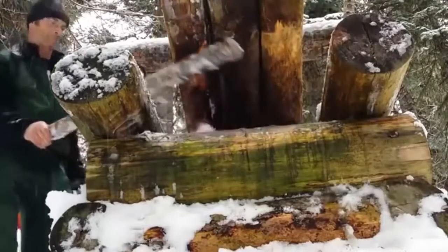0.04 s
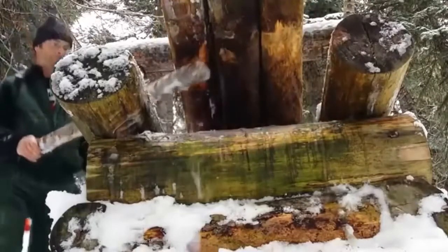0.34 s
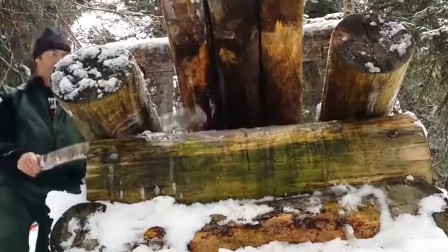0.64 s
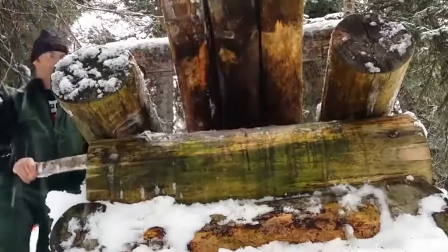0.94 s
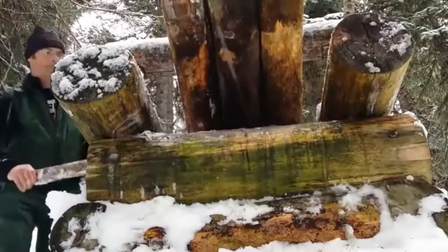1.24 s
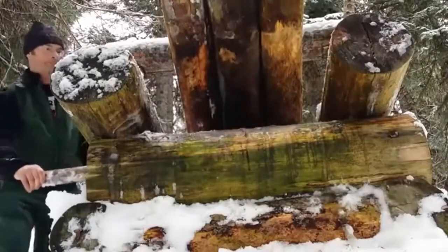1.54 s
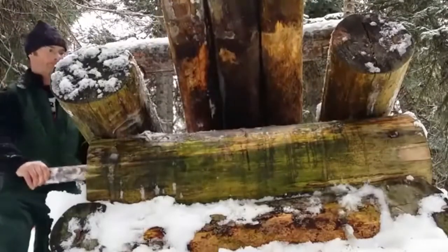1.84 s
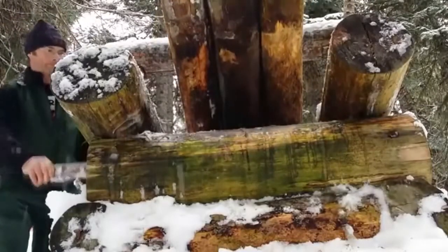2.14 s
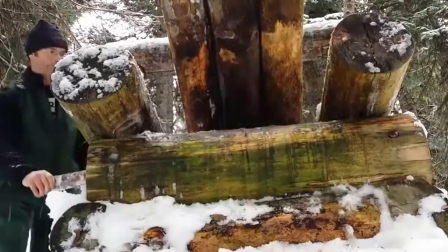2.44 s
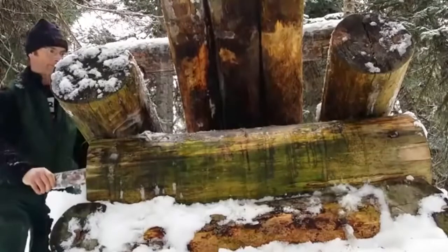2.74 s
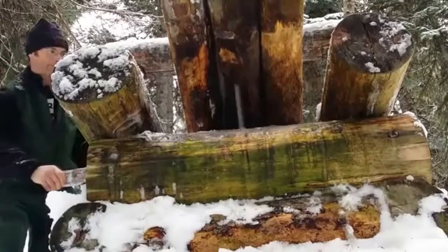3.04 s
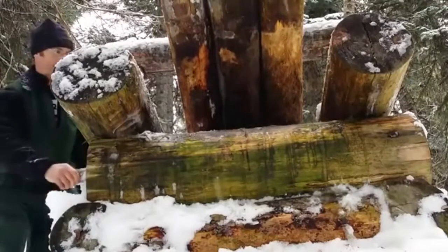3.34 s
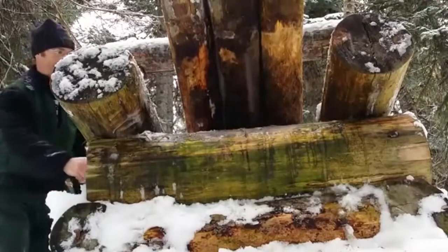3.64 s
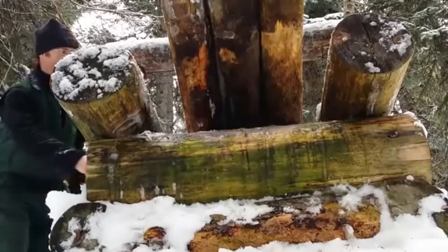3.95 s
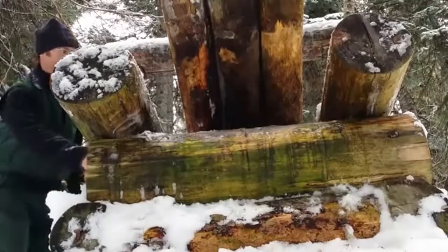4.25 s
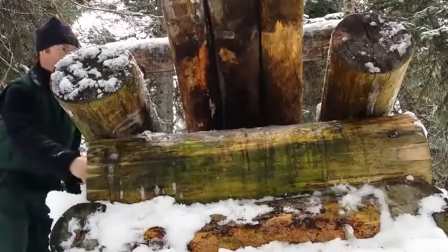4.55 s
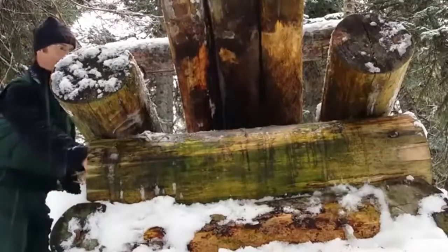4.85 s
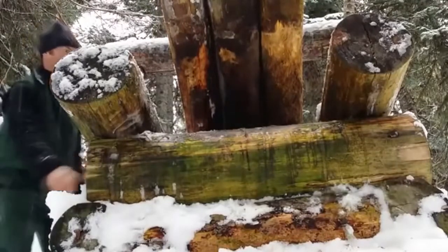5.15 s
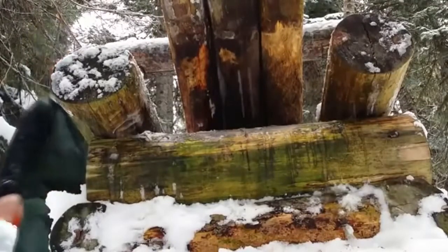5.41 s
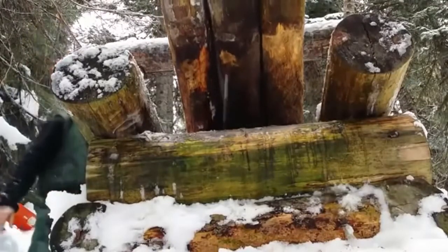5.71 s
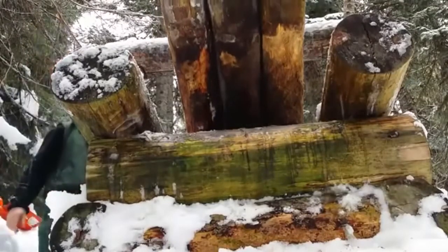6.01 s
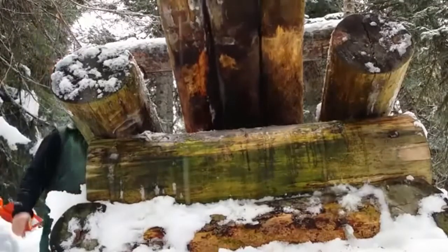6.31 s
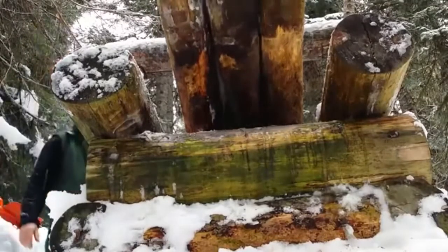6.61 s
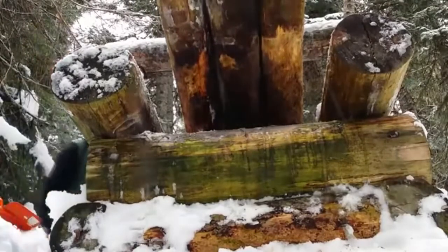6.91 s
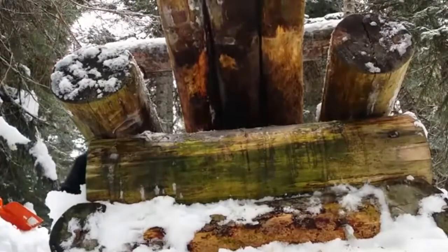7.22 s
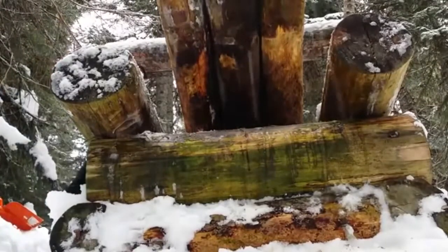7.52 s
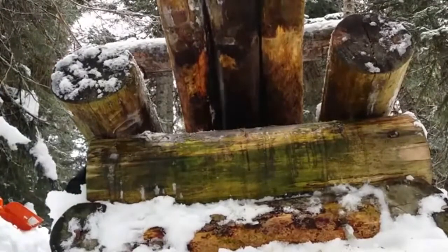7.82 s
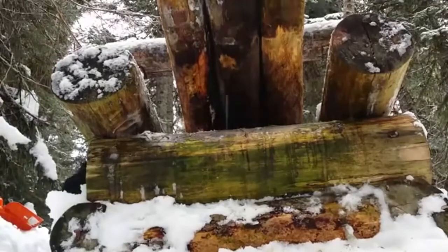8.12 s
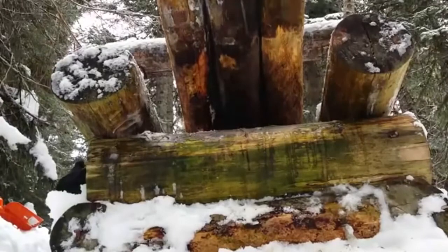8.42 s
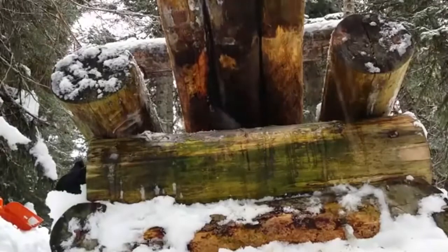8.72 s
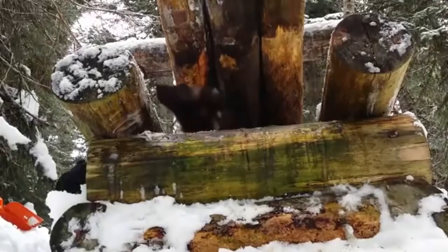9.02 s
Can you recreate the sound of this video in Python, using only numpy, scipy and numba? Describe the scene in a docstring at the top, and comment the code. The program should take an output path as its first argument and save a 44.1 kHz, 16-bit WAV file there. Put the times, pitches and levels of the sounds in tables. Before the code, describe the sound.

A bear roars harshly four times with fluttering snarls, then keeps up low, breathy growls inside a log den.

```python
"""A harsh roar comes first: a bear shut in a log den in a snowy forest, heard from just outside on a stereo
pair. It roars four times, its vocal folds chopping a blast of air, and after each roar its lips flap in a
snarl. Then it keeps up low, rumbling growls while air hisses through its nose, with moans, one rasp and one
short groan. Now and then it bumps the logs; faint forest air lies behind."""
import sys
import numpy as np
from scipy import signal
from scipy.fft import rfft, irfft, next_fast_len
from scipy.io import wavfile
from scipy.ndimage import uniform_filter1d
from numba import njit

SR = 44100
rng = np.random.default_rng(int(sys.argv[2]) if len(sys.argv) > 2 else 0)


def transcribe(u):
    """Save the signal u as a 16-bit wav file named by the first command-line argument.

    u: samples, shape (n,) or (channels, n), limited to [-1, 1]; the rate is SR.
    q: integer samples, one column per channel.
    """
    v = np.clip(np.atleast_2d(u).T, -1, 1)
    q = np.round(v * 32767).astype(np.int16)
    wavfile.write(sys.argv[1], SR, q)


N = 408531
T = np.arange(N) / SR
FFT_SIZE = next_fast_len(N + 4096)
HZ = np.maximum(np.arange(FFT_SIZE // 2 + 1) * SR / FFT_SIZE, 1)


def from_db(db):
    return 10 ** (np.asarray(db) / 20)


def rms_one(x):
    return x / np.sqrt(np.mean(x ** 2) + 1e-20)


def add(out, s, sound):
    """Mix a short sound in at s seconds."""
    i = int(s * SR)
    sound, i = sound[..., max(-i, 0):], max(i, 0)
    out[..., i:i + sound.shape[-1]] += sound[..., :N - i]


def envelope(attack, hold, release, swell_db=0, curve=1):
    """A rounded attack, a hold that swells or sags, a release of 60 dB (curve over 1: slow at first)."""
    t = np.arange(int((attack + hold + release) * SR)) / SR
    rise = np.sin(np.pi / 2 * np.minimum(t / attack, 1)) ** 2
    held = np.clip((t - attack) / hold, 0, 1)
    gone = np.maximum(t - attack - hold, 0) / release
    return rise * from_db(swell_db * held - 60 * gone ** curve)


def during(start, end, fade):
    """1 from start to end, with fades outside."""
    return np.clip(np.minimum(T - start, end - T) / fade + 1, 0, 1)


def at_hz(points):
    """Join (f/Hz, value) points over log frequency."""
    hz, value = np.transpose(points)
    return np.interp(np.log(HZ), np.log(hz), value)


def shape(x, gain):
    """Apply a smooth gain over frequency."""
    return irfft(rfft(x, FFT_SIZE) * gain, FFT_SIZE)[..., :N]


def drift(rate_hz):
    """A smooth random wander of spread 1."""
    step, settle = 40, 2000
    r = np.exp(-2 * np.pi * rate_hz * step / SR)
    noise = rng.standard_normal(N // step + settle + 2)
    slow = signal.lfilter([1], [1, -2 * r, r * r], noise)[settle:]
    return np.interp(np.arange(N) / step, np.arange(len(slow)), rms_one(slow))


def pulses(per_s, jitter, shimmer_db):
    """Clicks at a running rate, each off in time (share of a cycle) and strength."""
    cycles = np.cumsum(per_s) / SR
    at = np.flatnonzero(np.diff(np.ceil(cycles), prepend=0))
    late, strong = rng.standard_normal((len(at), 2)).T
    at = np.clip(at + jitter * late * SR / per_s[at], 0, N - 1).astype(int)
    out = np.zeros(N)
    out[at] = from_db(shimmer_db * strong)
    return out


def puffs(clicks, rise_s):
    """Each click lets out a puff that swells to the click's height and dies."""
    r = np.exp(-1 / (rise_s * SR))
    return signal.lfilter([np.e / (rise_s * SR)], [1, -2 * r, r * r], clicks + 1e-18)


def tone(hz):
    """A sine that follows a running pitch."""
    return np.sin(2 * np.pi * np.cumsum(hz) / SR)


def steady(x, span_s):
    """Hold the running rms near 1."""
    power = np.mean(np.atleast_2d(x) ** 2, axis=0)
    for _ in range(2):
        power = uniform_filter1d(power, max(int(span_s * SR), 1))
    return x / np.sqrt(np.abs(power) + 1e-12)


def split(x, crossover_hz=1120):
    """The throaty part and the bright part of a voice."""
    low = 1 / (1 + (HZ / crossover_hz) ** 8)
    return shape(x, low), shape(x, 1 - low)


def ring(x, hz, width_hz):
    """Pass twice through one resonance; rms 1."""
    b, a = signal.iirpeak(hz, hz / width_hz, fs=SR)
    return rms_one(signal.lfilter(b, a, signal.lfilter(b, a, x)))


@njit
def moving_peak(x, angle, up, down):
    """A peak or dip whose centre (radians per sample) moves; its two states turn like a phasor."""
    out, a, b = np.empty(len(x)), 0., 0.
    for i in range(len(x)):
        out[i] = x[i] + (up - down) * a
        a += x[i] - down * a - angle[i] * b
        b += angle[i] * a
    return out


def resonate(x, modes, stretch=1):
    """A chain of ringing peaks and dips, all moved together by the shape of the mouth."""
    for hz, width, boost_db in modes:
        gain, damping = from_db(boost_db), 2 * np.pi * width / SR
        up, down = damping * max(gain, 1), damping / min(gain, 1)
        angle = 2 * np.sin(np.pi * hz / SR) * stretch * np.ones(N)
        x = np.array([moving_peak(side, angle, up, down) for side in x])
    return x


# How alike the air is at the two microphones: f/Hz, correlation
MIC_LIKENESS = [(800, .99), (1400, .88), (3100, .7), (6800, .2), (14000, .05)]
def air(colour):
    """Coloured noise across the pair, alike in the bass and wide in the treble; rms 1."""
    mid, side = rfft(rng.standard_normal((2, FFT_SIZE)))
    alike = at_hz(MIC_LIKENESS)
    pair = np.sqrt(1 + alike) * mid + np.sqrt(1 - alike) * side * np.array([[1], [-1]])
    return rms_one(irfft(pair * from_db(at_hz(colour)), FFT_SIZE)[:, :N])


# The forest all around the microphones: f/Hz, level/dB
FOREST_COLOUR = [(30, -16), (477, -4.5), (4500, -8.5), (7200, -8.5), (14500, -27.5)]
def forest(level_db=-60.5):
    """The faint, even hush of a still forest."""
    return from_db(level_db) * air(FOREST_COLOUR)


# Sharp clicks, one in the first snarl, then a few faint ticks: t/s, level/dB
SHARP_CLICKS = [(0.2246, -11.5), (2.6305, -36), (3.632, -33.5), (5.7176, -30.5), (6.0973, -33)]
def sharp_clicks(t60=.035, trim_db=-8):
    """Each click is a burst of bright noise that dies at once."""
    out, t = np.zeros((2, N)), T[:SR // 2]
    for s, level_db in SHARP_CLICKS:
        add(out, s, from_db(level_db + trim_db - 60 * t / t60) * rng.standard_normal((2, len(t))))
    return out


# Knocks on the den wall: t/s, level/dB, ring/s
LOG_KNOCKS = [(2.888, -29, 0.023), (2.972, -16.5, 0.023), (2.978, -35, 0.09), (3.0, -36, 0.071),
              (3.174, -23, 0.029), (6.098, -34.5, 0.023), (6.161, -38, 0.025), (6.335, -41.5, 0.097)]
# Modes of a damp log: f/Hz, level/dB
LOG_MODES = [(520, 8.5), (640, 9.5), (790, 0), (1010, 2.5), (1240, -9), (1560, -16)]
# The heavy body against the wall: t/s, f/Hz, level/dB, ring/s
BODY_BUMPS = [(0.242, 75.6, -12.5, 0.25), (0.236, 200, -11.5, 0.071), (1.9, 230, -26, 0.049),
              (6.335, 380, -34, 0.32), (6.335, 477, -25, 0.098)]
def logs(knock_db=-8, crunch=.9, crunch_hz=(500, 2300)):
    """Damp logs ring briefly with a dry crunch when knocked, and boom when leaned on."""
    out, t = np.zeros((2, N)), T[:SR // 2]
    crunch_band = signal.butter(2, crunch_hz, "band", fs=SR, output="sos")
    for s, level_db, t60 in LOG_KNOCKS:
        chance = rng.standard_normal((len(LOG_MODES), 2))
        modes = sum(from_db(db + 2 * strong) * np.sin(2 * np.pi * hz * t + phase)
                    for (hz, db), (strong, phase) in zip(LOG_MODES, chance))
        grit = rms_one(signal.sosfilt(crunch_band, rng.standard_normal(len(t))))
        gain = from_db(level_db + knock_db - 60 * t / t60) * (1 - np.exp(-t / .0038))
        add(out, s, gain * (modes + crunch * grit))
    for s, hz, level_db, t60 in BODY_BUMPS:
        gain = from_db(level_db - 60 * t / t60) * (1 - np.exp(-t / .00087))
        add(out, s, gain * np.sin(2 * np.pi * hz * t))
    return out


def den_echoes(x, t60=.045, wet=.5):
    """Dense early echoes off the logs, partly different at each microphone, comb the sound."""
    t = T[:int(t60 * SR)]
    shared, left, right = rng.standard_normal((3, len(t))) * from_db(-60 * t / t60) * (t > .001)
    echoes = shared + .42 * np.array([left, right])
    echoes /= np.sqrt(np.sum(echoes ** 2, axis=1, keepdims=True))
    return x + wet * signal.fftconvolve(x, echoes, axes=1)[:, :N]


# A rasp between growls: t/s, attack/s, hold/s, release/s, swell/dB, level/dB
RASP_BREATHS = [(5.06, .15, .57, .45, -5, -39.5)]
# Its rush of air: f/Hz, level/dB
RASP_AIR = [(210, -9), (350, -12), (880, 11), (2250, -16), (2800, -20), (4300, -14.5), (6000, -13),
            (9000, -33), (12000, -49)]
# Resonances of the narrowed airway: f/Hz, width/Hz, boost/dB
AIRWAY_MODES = [(910, 46, -14.5), (1058, 42, 8), (1318, 32, 12.5), (2040, 69, 20), (2496, 45, 20.5),
                (3050, 110, 16), (3710, 39, 18.5), (4200, 48, 18.5), (4800, 120, 11)]
def rasp(flutter_per_s=33, leak=.5):
    """The soft palate flutters in a narrowed, ringing airway."""
    flutter = pulses(flutter_per_s * from_db(drift(6.4)), jitter=.091, shimmer_db=5)
    voice = resonate(air(RASP_AIR) * (leak + puffs(flutter, rise_s=.013)), AIRWAY_MODES)
    gain = np.zeros(N)
    for s, attack, hold, release, swell_db, level_db in RASP_BREATHS:
        add(gain, s, from_db(level_db) * envelope(attack, hold, release, swell_db))
    return gain * steady(voice, span_s=.15)


# Moans and wheezes: t/s, attack/s, hold/s, release/s, level/dB, f/Hz
BREATH_MOANS = [(2.203, 0.042, 0.035, 0.24, -26.5, 689), (2.514, .02, 0.024, 0.18, -38, 2385),
                (4.2, 0.18, .2, .4, -51, 838), (4.254, 0.14, 0.13, 0.62, -51, 2450),
                (4.25, 0.13, .25, 0.45, -55, 1210), (4.3, .1, 0.22, .5, -58, 5170),
                (5.16, .035, .036, 0.2, -45.5, 2525), (5.255, 0.032, 0.068, 0.23, -50, 1070),
                (5.688, 0.079, 0.041, 0.085, -46.5, 486), (5.732, 0.056, 0.025, 0.32, -46, 1460),
                (8.455, 0.13, 0.054, 0.091, -42.5, 630)]
def moans(hiss, snuffle, breath_db=-9):
    """Breath rings through the parted lips or the nostrils, with some snuffle around the ring."""
    out = np.zeros((2, N))
    for s, attack, hold, release, level_db, hz in BREATH_MOANS:
        effort = envelope(attack, hold, release)
        span = slice(int(s * SR), int(s * SR) + len(effort))
        ringing = ring(hiss[:, span] + snuffle[:, span], hz, width_hz=160 + .05 * hz)
        voice = ringing + from_db(breath_db) * snuffle[:, span]
        add(out, s, from_db(level_db) * effort[:voice.shape[1]] * voice)
    return out


# Air in the nostrils, and the low snuffle beneath it: f/Hz, level/dB
HISS_COLOUR = [(590, -12.5), (1000, -9.5), (1770, -8.5), (2480, -3.5), (5180, -4.5), (7250, -10.5),
               (9170, -4), (12500, -6.5), (14500, -12)]
SNUFFLE_COLOUR = [(50, -22), (280, 1.5), (400, -8), (505, -5.5), (590, -7.5), (830, -7), (970, -13.5),
                  (1100, -12), (1800, -23.5), (3000, -68.5)]
# Short snorts: t/s, level/dB
NOSE_SNORTS = [(1.19, -48), (2.592, -51.5), (8.56, -47.5)]
def nose(beats, hiss_gain, snuffle_gain, leak=.96, hiss_db=3.5, snuffle_db=-4):
    """Air hisses through the nostrils, the snuffle throbs with the growl, and both feed the moans."""
    hiss = air(HISS_COLOUR) * from_db(.5 * drift(40))
    throb = puffs(beats, rise_s=.011)
    snuffle = rms_one(air(SNUFFLE_COLOUR) * (leak + throb))
    snorts = np.zeros(N)
    for s, level_db in NOSE_SNORTS:
        add(snorts, s, from_db(level_db) * envelope(attack=.046, hold=.0082, release=.44))
    out = from_db(hiss_db) * np.hypot(hiss_gain, snorts) * hiss
    out += from_db(snuffle_db) * snuffle_gain * snuffle
    return out + moans(hiss * throb, snuffle)


# A late groan in the den: t/s, attack/s, hold/s, release/s, level/dB, first f/Hz, last f/Hz
GROAN_GLIDES = [(7.796, 0.044, 0.038, 0.11, -26, 213.5, 218)]
def groan(octave_db=-22):
    """A short, hollow groan glides out of the growl."""
    out = np.zeros(N)
    for s, attack, hold, release, level_db, first_hz, last_hz in GROAN_GLIDES:
        effort = envelope(attack, hold, release)
        pitch = np.linspace(first_hz, last_hz, len(effort)) * from_db(.2 * drift(30)[:len(effort)])
        add(out, s, from_db(level_db) * effort * (tone(pitch) + from_db(octave_db) * tone(2 * pitch)))
    return out


# Growling breaths behind the logs: t/s, attack/s, hold/s, release/s, swell/dB, then level/dB of each of the
# growl's first three harmonics, the hiss and the snuffle
GROWL_BREATHS = [(-.1, 0.047, 0.38, 0.16, 5.5, -42, -37.5, -38.5, -42.5, -54),
                 (.34, 0.085, 0.081, 0.21, -2, -36, -34, -32, -38.5, -26.5),
                 (.58, 0.1, 0.66, 1, -1.5, -36.5, -49.5, -48, -61, -43),
                 (1.43, 0.13, 0.75, 0.47, -6, -41, -37.5, -37, -46, -37),
                 (2.48, 0.12, 0.11, 0.92, -1, -37.5, -45, -39.5, -67, -42),
                 (3.2, 0.046, 0.59, 0.99, 9.5, -46, -57, -54.5, -65.5, -56.5),
                 (3.68, 0.35, 0.22, 0.43, 3, -38, -44.5, -38.5, -48, -45.5),
                 (4.05, 0.4, 0.22, 1, -4, -27, -28, -27.5, -45.5, -35.5),
                 (5.02, 0.3, 0.51, 0.51, 0, -45.5, -46.5, -45, -60.5, -43),
                 (6.0, 0.067, 0.43, 0.27, 9.5, -53.5, -56, -59, -66, -52.5),
                 (6.53, 0.22, 0.75, 1, 5, -42.5, -45, -44.5, -56.5, -49),
                 (7.5, 0.35, 0.17, 1, 2, -34.5, -43, -37.5, -50, -45),
                 (7.999, 0.25, 0.37, 0.46, 2.5, -38, -36.5, -49.5, -50, -48.5),
                 (8.62, 0.067, 0.22, 0.21, -14, -40.5, -37.5, -49, -49, -48.5),
                 (9.08, 0.13, 0.14, 0.27, 0, -69, -60, -76, -67.5, -56)]
def breaths(nose_follows=.64):
    """Each breath drives the growl's three harmonics, the hiss and the snuffle: five gains."""
    power = np.zeros((5, N))
    for s, attack, hold, release, swell_db, *levels_db in GROWL_BREATHS:
        effort = envelope(attack, hold, release, swell_db, curve=.95)
        flow = effort ** nose_follows   # the nose follows only a share of the swing in dB
        gains = from_db(levels_db)[:, None] * np.array([effort, effort, effort, flow, flow])
        add(power, s, gains ** 2)
    return np.sqrt(power)


# Bands around the growl's first three harmonics: f/Hz, width/Hz
GROWL_BANDS = [(78, 32), (151, 20), (250, 47)]
# Pitch of the vocal folds, one list for the purr and one for each long growl: t/s, f/Hz
FOLD_PITCH = [
    [(0.65, 87.2), (0.776, 80.1), (1.204, 79.5), (1.326, 88.07)],
    [(3.4, 73.95), (4.59, 77.6), (4.756, 68.97)],
    [(6.7, 68.08), (7.36, 78.15), (7.93, 70.7), (8.7, 77)],
]
# Share of rumble in each of the first three harmonics
RUMBLE_SHARES = (.48, .5, .85)
def growl(beats, gains, purr_s=(.72, 1.43), throb_db=3.5, top_hz=325, bottom_hz=53):
    """The vocal folds hum low; around each of their first three harmonics the uneven throat pulses add a rough
    rumble."""
    unrest = 1 - .8 * during(*purr_s, fade=.1)   # the purr is cleaner and more even
    pitch = np.interp(T, *np.concatenate(FOLD_PITCH).T) * from_db(.3 * unrest * drift(12))
    drive = rng.standard_normal(N) + rms_one(beats)
    out = 0
    for harmonic, ((hz, width), gain, rough) in enumerate(zip(GROWL_BANDS, gains, RUMBLE_SHARES), 1):
        hum = (1 - rough) * np.sqrt(2) * tone(harmonic * pitch)
        boom = rough * unrest * ring(drive, hz, width)
        throb = from_db(throb_db * rough * unrest * drift(20))
        out += throb * gain * steady(hum + boom, span_s=.07)
    return shape(out, 1 / (1 + (HZ / top_hz) ** 20) / (1 + (bottom_hz / HZ) ** 12))


# Snarls and the softer purrs they sink into: t/s, attack/s, hold/s, release/s, swell/dB, throat level/dB,
# lips against throat/dB, flap rate/Hz, lip gap's first f/Hz and last f/Hz, teeth ring/dB
SNARL_BREATHS = [(.175, .014, 0.1, 0.1, -2.5, -23.5, 4.5, 44.13, 1747, 1660, -12.5),
                 (.461, 0.0083, 0.1208, 0.336, 1.5, -22, -3.5, 46.6, 2064, 1960, -33),
                 (0.6526, .01, 0.042, 0.38, 2, -35.5, -1.5, 40.5, 2240, 2120, -15),
                 (.7265, .04, .6, .22, -3, -39, -2.5, 40.7, 2000, 2000, -6),
                 (1.8508, 0.008, .14, 0.11, 3, -21, -1, 49.5, 1747, 1848, -10),
                 (2.1872, 0.0122, .075, 0.265, 7, -21.5, -4, 53.9, 1670, 1970, -12.5),
                 (2.3135, 0.0087, .062, 0.11, 2, -21, -8, 53.7, 1950, 1638, -22),
                 (2.382, 0.017, 0.044, 0.65, 3.5, -26.5, 1.5, 52.3, 2018, 1627, -30)]
def snarl_effort():
    """Gains of throat and lips; the lips swell and sag less, and stop sooner."""
    throat, lips = np.zeros((2, N))
    for s, attack, hold, release, swell_db, level_db, lips_db, *_ in SNARL_BREATHS:
        add(throat, s, from_db(level_db) * envelope(attack, hold, release, swell_db))
        add(lips, s, from_db(level_db + lips_db) * envelope(attack, hold, .76 * release, .38 * swell_db))
    return throat, lips


def lip_flaps(first_flap_s=.008, jitter=.04, shimmer_db=2):
    """Nearly even flaps of uneven strength; the ring of the lip gap slides over each snarl."""
    flaps, gap_hz, teeth_gain = np.zeros((3, N))
    for s, attack, hold, release, *_, per_s, first_hz, last_hz, teeth_db in SNARL_BREATHS:
        start = int((s + first_flap_s) * SR)
        t = T[:int((attack + hold + release) * SR)]
        late, strong = rng.standard_normal((2, 64))
        cycles = (np.arange(len(late)) + jitter * late).clip(0)
        at = (cycles / per_s * SR).astype(int)
        inside = at < len(t)
        flaps[start:] = 0   # a new snarl takes over from the last
        flaps[start + at[inside]] = from_db(shimmer_db * strong[inside])
        gap_hz[start:start + len(t)] = np.interp(t, [0, attack + hold + release / 10], [first_hz, last_hz])
        teeth_gain[start:] = from_db(teeth_db)
    return flaps, gap_hz, teeth_gain


# The breath of a snarl: f/Hz, level/dB
SNARL_AIR = [(76, -54), (130, -10.5), (171, -33), (226, -7.5), (329, -15.5), (620, -5), (953, -15),
             (1500, -12.5), (2300, -17.5), (3300, -19), (4440, -22.5), (7130, -32.5), (9210, -23.5),
             (14500, -78)]
# Resonances of the snarling mouth: f/Hz, width/Hz, boost/dB
MOUTH_MODES = [(205, 20, 10), (395, 60, 9.5), (553, 51, 9), (1418, 86, 14), (1576, 39, -6.5),
               (2002, 81, 11.5), (2274, 140, 8.5), (2630, 280, -6), (3070, 85, 5), (3500, 62, 8.5)]
def snarls(leak=1.15, hiss_share=.38, chirp_share=.36, chirp_s=.009, teeth_hz=3130, ring_db=6,
           low_db=-1.86, high_db=-.5):
    """Each flap of the lips pops with a falling ring, and the throat booms between the flaps."""
    flaps, gap_hz, teeth_gain = lip_flaps()
    throat_gain, lips_gain = snarl_effort()
    force = np.clip(4 * lips_gain / lips_gain.max() - .5, 0, 1)   # hard snarls ring, soft ones purr
    opening = puffs(flaps, rise_s=.003)
    boom = puffs(np.roll(flaps, int(chirp_s * SR / 2)), rise_s=.004)
    low, high = split(resonate(air(SNARL_AIR), MOUTH_MODES))
    throat = steady(low * (leak + boom), span_s=.025)
    high = rms_one(high)
    middle = shape(high, 1 / (1 + (HZ / 5000) ** 8))   # the lips chop this band; the hiss above flows on
    breath = middle * (.27 + (1 - .3 * force) * opening) + hiss_share * (high - middle)
    flap_age = T - np.maximum.accumulate(T * (flaps > 0))
    fall = 1 + chirp_share * (.5 - np.minimum(flap_age / chirp_s, 1))
    fall *= from_db(1.1 * drift(60))   # the pitch is unsteady
    rings = tone(gap_hz * fall) + teeth_gain * tone(teeth_hz * np.sqrt(fall))
    lips = steady(den_echoes(breath + from_db(ring_db) * force * opening * rings), span_s=.04)
    return from_db(low_db) * throat_gain * throat + from_db(high_db) * lips_gain * lips


# Jaw and tongue, one list a roar: t/s, then f/Hz of four resonances from low to high
JAW_TRACKS = [
    [(0.025, 505, 955, 2500, 3230), (0.05, 503, 990, 2700, 3350), (0.103, 510, 1000, 2950, 3340),
     (0.155, 780, 890, 3050, 3330)],
    [(0.345, 490, 1230, 2770, 3680), (0.381, 500, 1160, 2810, 3700), (0.435, 485, 1060, 2900, 3830)],
    [(1.57, 516, 1000, 2560, 3560), (1.618, 630, 1620, 2860, 3820), (1.662, 568, 1630, 2930, 3430),
     (1.724, 647, 1662, 2513, 3300), (1.774, 556, 1970, 2600, 3590), (1.825, 538, 1750, 2580, 3647)],
    [(2.055, 564, 1170, 2800, 3350), (2.097, 558, 1098, 2680, 3340), (2.127, 689, 900, 2780, 3730),
     (2.16, 657, 842, 2755, 3510)],
]
# Sharpness of those four: width/Hz, boost/dB
JAW_SHARPNESS = [(65, 12), (120, 10), (130, 12), (170, 11)]
def jaw(voice, quiver_db=.86):
    """Four resonances glide as the jaw and tongue move, and quiver a little."""
    times, *tracks = np.concatenate(JAW_TRACKS).T
    for track, (width, boost_db) in zip(tracks, JAW_SHARPNESS):
        stretch = np.interp(T, times, track) / track.mean() * from_db(quiver_db * drift(14))
        voice = resonate(voice, [(track.mean(), width, boost_db)], stretch)
    return voice


# Four roars at whoever stands outside: t/s, attack/s, hold/s, release/s, swell/dB, level/dB, brightness/dB
ROAR_LUNGES = [(-0.04, 0.11, 0.087, 0.036, -8.5, -14.5, -1.5), (0.319, 0.048, 0.056, 0.071, -4, -15, -1),
               (1.516, 0.16, 0.14, 0.1, -2.5, -14.5, -2), (2.022, 0.069, 0.047, 0.12, 2, -16.5, -3)]
def roar_effort():
    """Gains of the throaty and the bright part; the brightness comes a touch later and leaves sooner."""
    gains = np.zeros((2, N))
    for s, attack, hold, release, swell_db, level_db, bright_db in ROAR_LUNGES:
        effort = envelope(attack, hold, release, swell_db, curve=1.16)
        add(gains, s, from_db(level_db) * np.array([effort, from_db(bright_db) * effort ** 1.03]))
    return gains


# The blast of a roar: f/Hz, level/dB
ROAR_AIR = [(65, -50.5), (110, -23.5), (138, -5), (180, -24.5), (234, -6), (331, -16), (390, -7.5),
            (552, 0), (831, -9.5), (1660, -20.5), (3690, -26), (5900, -29), (7390, -44.5), (9440, -29.5),
            (14500, -38)]
# Resonances of the open throat: f/Hz, width/Hz, boost/dB
THROAT_MODES = [(145, 13, 5), (223, 35, 13.5), (395, 53, 8.5), (843, 90, 4.5), (1620, 52, 5),
                (4660, 140, 6.5)]
def roars(pitch_hz=150, buzz_share=.84, leak=.93, low_db=1.6, high_db=-.5, shudder_db=1):
    """Chaotic slaps of the vocal folds chop a blast of air in the wide open, trembling throat."""
    slaps = pulses(pitch_hz * from_db(1.2 * drift(12)), jitter=.06, shimmer_db=2.5)
    blast = rms_one(air(ROAR_AIR) * (leak + puffs(slaps, rise_s=.0014)))
    buzz = rms_one(shape(slaps, from_db(at_hz(ROAR_AIR)) / (1 + (HZ / 4000) ** 2)))
    voice = resonate(blast + buzz_share * buzz, THROAT_MODES, stretch=from_db(.3 * drift(8)))
    low, high = split(jaw(voice))
    low_gain, high_gain = roar_effort()
    throaty = from_db(low_db) * low_gain * steady(low, span_s=.012)
    bright = from_db(high_db) * high_gain * steady(den_echoes(high), span_s=.015)
    return from_db(shudder_db * drift(45)) * (throaty + bright)


def scene(beats_per_s=29):
    """The bear and its den over a still forest; growl and nose share the same throat pulses."""
    beats = pulses(beats_per_s * from_db(1.5 * drift(4)), jitter=.1517, shimmer_db=5)
    *growl_gains, hiss_gain, snuffle_gain = breaths()
    voice = roars() + snarls() + growl(beats, growl_gains) + groan()
    breath = nose(beats, hiss_gain, snuffle_gain) + rasp()
    return voice + breath + logs() + sharp_clicks() + forest()


# Colour of the pair outside the den: f/Hz, left minus right/dB
MIC_BALANCE = [(700, 2.5), (1500, 3.5), (6200, 4.5), (8000, -1.5), (9200, -10), (11500, 1.5)]
def record(dry, low_cut_hz=47, ceiling=.9, top_hz=14400):
    """Each microphone has its own colour; deep bass is lost, peaks are rounded and the top is cut."""
    heard = shape(dry, from_db(at_hz(MIC_BALANCE) * np.array([[.5], [-.5]])))
    heard = signal.sosfilt(signal.butter(3, low_cut_hz, "high", fs=SR, output="sos"), heard)
    heard = heard / (1 + (heard / ceiling) ** 6) ** (1 / 6)
    return signal.sosfilt(signal.ellip(12, .1, 80, top_hz, fs=SR, output="sos"), heard)


dry = scene()
out = record(dry)
transcribe(out)
```